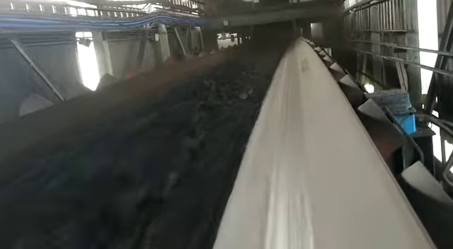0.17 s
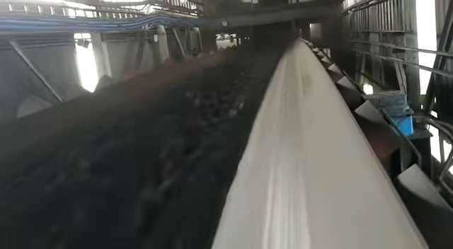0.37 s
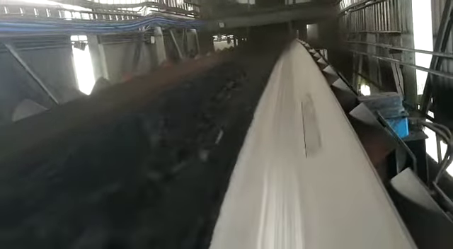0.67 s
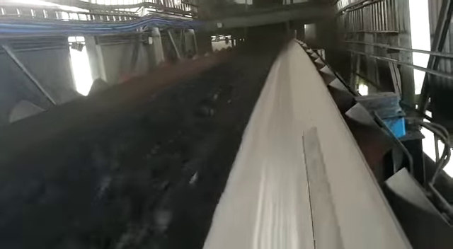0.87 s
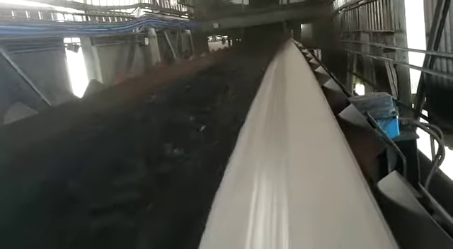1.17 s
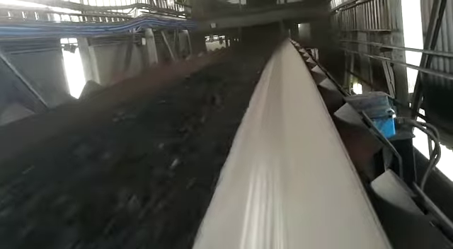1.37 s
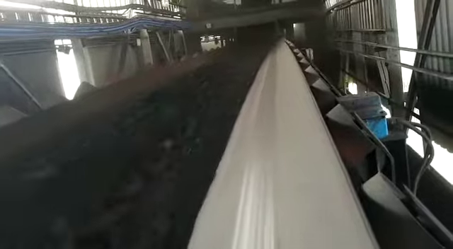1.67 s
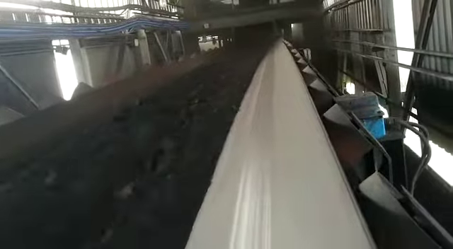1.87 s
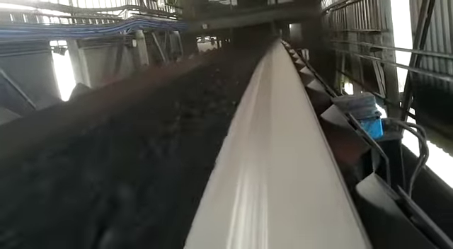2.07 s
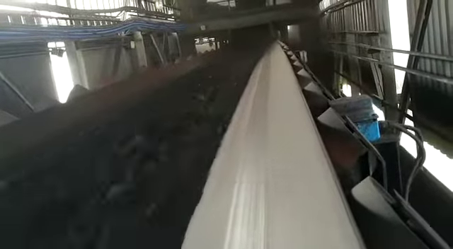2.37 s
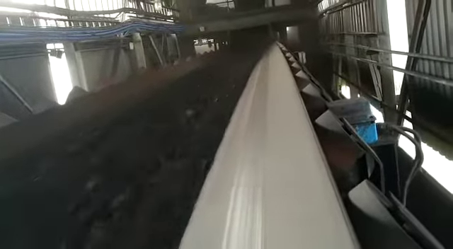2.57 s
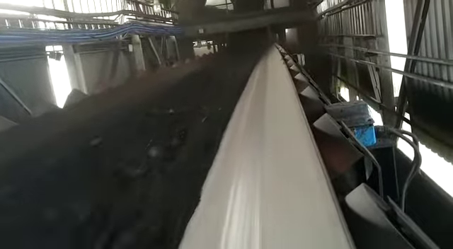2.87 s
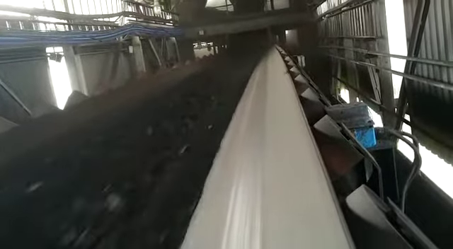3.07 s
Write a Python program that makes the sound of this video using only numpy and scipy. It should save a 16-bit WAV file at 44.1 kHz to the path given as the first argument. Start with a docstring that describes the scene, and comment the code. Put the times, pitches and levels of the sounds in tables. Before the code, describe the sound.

A conveyor roller squeaks quickly and regularly over the low rumble of the running belt.

```python
"""Squeaky conveyor roller

A loaded belt runs through a sheet-metal gallery. Belt and idlers rumble underneath, the steel frame
drones, and a farther roller moans now and then. Up front one dry roller squeaks once a turn, 5.5 times
a second: a stick-slip tone slides up, rasps and rings in the roller's shell and the gallery,
and the roller's stand hums after it."""
import sys
import numpy as np
from scipy import signal
from scipy.fft import rfft, irfft
from scipy.io import wavfile
from scipy.ndimage import uniform_filter1d, minimum_filter1d

SR = 44100
rng = np.random.default_rng(int(sys.argv[2]) if len(sys.argv) > 2 else 0)


def persist_wave(psi):
    """Save psi, clipped to +-1, as 16-bit WAV."""
    counts = np.round(np.clip(psi, -1, 1) * 32767).astype(np.int16)
    wavfile.write(sys.argv[1], SR, np.atleast_2d(counts).T)


N = 142002

# Tone of the belt and idlers. Each row: frequency in Hz, relative noise density in dB.
RUMBLE_SPECTRUM = [(15, -36), (30, -47), (48, -15.5), (85, -1.5), (150, 1), (200, -2.5), (225, -6.5),
                   (400, -8), (510, -8), (700, -11.5), (1050, -15.5), (1500, -22), (2400, -25.5),
                   (3300, -21), (4500, -28), (7000, -34.5), (8600, -50), (13000, -51.5), (14500, -79)]
# Stereo image of the rumble. Each row: frequency in Hz, left-right likeness from 0 (wide) to 1 (mono).
RUMBLE_LIKENESS = [(30, 1), (110, 1), (180, 0.98), (270, 0.98), (420, 0.65), (700, 0.65), (1100, 0.23),
                   (2000, 0), (12000, 0)]
# Fader ride on belt and frame together. Each row: time in seconds, gain in dB.
BED_RIDE = [(0, 0), (.9, .3), (1.35, -1), (1.8, .5), (2.3, 0.3), (2.7, 0.5), (3.199, -0.5)]
# Drones of the frame. Each row: pitch in Hz, half-width in Hz, level in dB before the ride.
FRAME_DRONES = [(55, 5.4, -41), (101.6, 3, -36), (159, 9.3, -40.5), (464, 4.4, -44), (490.4, 7.1, -45.5)]
# Path of the strongest drone. Each row: time in seconds, pitch in Hz, level in dB before the ride.
DRONE_DRIFT = [(0, 176.5, -29.5), (.45, 180.3, -29.5), (1.1, 178.9, -28), (1.4, 172, -36.5),
               (1.8, 190, -29.5), (2.2, 196.8, -30.5), (2.7, 194, -33), (3.2, 194, -31)]
# Moans of the farther roller. Each row: start in seconds, length in seconds, level at the crest in dB.
FAR_MOANS = [(1.114, 0.14, -33.5), (1.655, 0.17, -28.5), (2.615, 0.13, -37), (2.933, .17, -32.5)]
# That roller's modes. Each row: pitch in Hz, half-width in Hz, relative level in dB.
FAR_MODES = [(869, 18, -9.5), (956, 10, -18), (912, 34, -21.5), (1002, 8.8, -10.5), (1040, 22, -18)]
# Fader ride on the stand's hum. Each row: time in seconds, gain in dB.
HUM_RIDE = [(.1, -33.5), (.35, -32.5), (.6, -45), (.85, -29.5), (1.05, -33), (1.35, -47), (1.75, -27.5),
            (2.3, -32), (2.75, -32), (3.1, -33)]
# Dry rubbing under each squeak. Each row: frequency in Hz, relative noise density in dB.
RUB_SPECTRUM = [(900, -42), (1600, -2), (2300, 5.5), (3200, -5), (4500, -1), (6200, -10), (6700, -33),
                (8000, 7), (8600, -63), (10200, -22), (11800, -16), (13300, -26), (14000, -47)]
# Bright scrape as the dry spot grabs. Each row: frequency in Hz, relative noise density in dB.
BITE_SPECTRUM = [(2000, -12), (5000, -3), (8000, 6.5), (9000, -2), (11500, -0.5), (13400, -2), (14000, -8),
                 (15500, -15)]
# One squeak per turn. Each row: start in seconds, pitch in Hz, roughness from 0 to 1,
# relative levels of harmonics 1-4 in dB, left-minus-right balances of harmonics 2-4 in dB.
TURNS = [(0.031, 1899, 0.88, -26, -24, -28, -31, 3, 4, -4),
         (0.211, 1886, 0.64, -19, -20, -29.5, -27, -0.5, -3, -2),
         (0.395, 1930, 0.82, -27.5, -23.5, -28.5, -33.5, -1.5, 3, 3),
         (0.576, 1889, 0.42, -24.5, -20.5, -23, -25, -3.5, 9, 6),
         (0.761, 1897, 0.44, -17.5, -17.5, -17.5, -25, -1.5, 1.5, -2),
         (0.941, 1892, 0.71, -20.5, -16.5, -18.5, -21.5, 2, -9, -0.5),
         (1.125, 1887, 0.59, -21.5, -24, -26, -34, 4.5, -4, -2),
         (1.305, 1888, 0.38, -18.5, -12.5, -23, -23.5, -5, -5, -10),
         (1.483, 1874, 0.71, -20, -14.5, -20.5, -21, 5.5, -6, -6),
         (1.67, 1891, 0.95, -22, -22.5, -25.5, -27.5, 4, -1, -6),
         (1.855, 1878, 0.66, -20.5, -21.5, -20, -25, -3, 6, 7),
         (2.034, 1902, 0.98, -23.5, -19.5, -22.5, -28.5, 7, -2, -4),
         (2.219, 1892, 0.35, -24, -20.5, -21.5, -30, 7, 7, 0),
         (2.398, 1860, 0.62, -16, -18.5, -12.5, -22, -1.5, 2, 3.5),
         (2.58, 1886, 0.52, -19, -16.5, -21, -26.5, 3, -7, -0.5),
         (2.761, 1894, 1, -23.5, -23.5, -27, -32.5, -0.5, 0, -6),
         (2.948, 1893, 0.49, -24, -24, -23, -25.5, -3.5, 2, 0),
         (3.128, 1893, 0.99, -22.5, -19.5, -23.5, -30.5, -7.5, 0, -4)]
# How harmonics 1-4 grow and ring. Each row: head start in seconds, rise in seconds, sag in dB per second,
# shell mode in Hz, its bandwidth in Hz, its gain in dB for a harmonic at RING_REF_DB,
# reverb time in seconds, rasp at full roughness in dB.
HARMONIC_SHAPES = [(0.02, 0.014, -47, 1879, 8.1, -16, 0.42, -38),
                   (0.016, 0.024, -44, 3809, 10.2, 7.5, 0.27, -16.5),
                   (0.0048, 0.01, -116, 5563, 11.3, 1, 0.25, -9),
                   (0.0054, 0.012, -110, 7563, 50, -20, 0.27, -13)]
# Weak harmonics 5-8. Each entry: level in dB relative to the fourth, before the colour EQ.
TOP_HARMONICS_DB = [-20.5, -23.5, -18.5, -42]
# Tone colour of the squeaks, an EQ with deep notches in the treble. Each row: frequency in Hz, gain in dB.
SQUEAK_COLOUR = [(1500, 5.5), (1680, -10), (1790, 0), (3900, 0.5), (4300, -5), (4850, 4), (5100, 3.5),
                 (5600, 0), (5750, -3.5), (5900, -0.5), (6050, -4), (6650, -2), (7400, 0.5), (8050, -0.5),
                 (8600, -24), (9600, 3.5), (10300, -2), (10700, -17), (11200, 0), (11800, -6), (12400, -13),
                 (12850, 3.5), (13250, -1), (13650, -22), (14500, -17), (15100, 0)]
# Slaps off the gallery walls. Each row: delay in seconds, gain in dB before the loss per harmonic.
WALL_ECHOES = [(.009, -1), (.027, -2.5), (.057, -2.5)]

RING_REF_DB = -25  # harmonics louder than this lock harder onto the shell's modes, dB for dB


def amp(db):
    """Decibels to gain."""
    return 10 ** (np.asarray(db) / 20)


def unit_rms(x):
    """Scales to rms 1."""
    return x / np.sqrt(np.mean(x ** 2) + 1e-20)


def curve_at(points, hz):
    """Reads a curve on a log-frequency axis."""
    f, value = np.transpose(points)
    return np.interp(np.log(hz + 1), np.log(f + 1), value)


def place(mix, start_s, sound):
    """Drops a stereo sound into the mix."""
    at = round(start_s * SR)
    sound = sound[:, max(-at, 0):]
    part = mix[:, max(at, 0):][:, :sound.shape[1]]
    part += sound[:, :part.shape[1]]


def band(size, hz, half_width):
    """Resonant noise of rms 1; centred on 0 Hz it is a random wobble."""
    f = np.fft.rfftfreq(size, 1 / SR)
    return unit_rms(irfft(rfft(rng.standard_normal(size)) / (1 + ((f - hz) / half_width) ** 2), size))


def hiss(spectrum, size):
    """Friction noise of a given colour."""
    colour = amp(curve_at(spectrum, np.fft.rfftfreq(size, 1 / SR)))
    return irfft(rfft(rng.standard_normal(size)) * colour)


def gallery(x, t60, harmonic, direct_db=-6.5, loss_db=4):
    """A dense stereo tail, the direct sound and wall slaps that lose loss_db per harmonic."""
    t = np.arange(9600) / SR
    response = rng.standard_normal((2, len(t))) * amp(-60 * t / t60)
    response /= np.linalg.norm(response, axis=1, keepdims=True)
    response[:, 0] += amp(direct_db)
    for delay, db in WALL_ECHOES:
        at = round(delay * SR) + rng.integers(0, 40, 2)  # a little different at each ear
        response[[0, 1], at] += amp(db - loss_db * (harmonic - 0.5))
    return signal.fftconvolve(x[None], response, axes=1)[:, :len(x)]


def levelled(x, t, db, pan_db=0):
    """Sets level and balance by the loud first 95 ms of a squeak."""
    loud = (t > 0) & (t < .095)
    ears = unit_rms(amp([[pan_db / 2], [-pan_db / 2]]))
    return amp(db) * ears * x / np.sqrt(np.mean(x[:, loud] ** 2, axis=1, keepdims=True) + 1e-20)


def belt_rumble(level_db=-24.5, patch_db=0.58, swell_db=0.83):
    """The loaded belt rumbles over its idlers, with drifting patches of colour and a slow swell."""
    frames, hz = N // 512 + 5, np.fft.rfftfreq(2048, 1 / SR)
    noise = rng.standard_normal((5, frames, len(hz))).transpose(0, 2, 1)
    left, unrelated = noise[0] + 1j * noise[1], noise[2] + 1j * noise[3]
    likeness = curve_at(RUMBLE_LIKENESS, hz)[:, None]
    right = likeness * left + np.sqrt(1 - likeness ** 2) * unrelated
    patches = unit_rms(uniform_filter1d(uniform_filter1d(noise[4], size=14, axis=0), size=8, axis=1))
    swell = unit_rms(uniform_filter1d(rng.standard_normal(frames), size=16))
    colour = amp(curve_at(RUMBLE_SPECTRUM, hz)[:, None] + patch_db * patches + swell_db * swell)
    _, rumble = signal.istft(np.array([left, right]) * colour, nperseg=2048, noverlap=1536)
    return amp(level_db) * unit_rms(rumble[:, :N])


def frame_drone(waver_hz=9.2):
    """The steel frame sings in narrow, wavering bands; the strongest drifts in pitch."""
    times, pitches, levels = np.transpose(DRONE_DRIFT)
    t = np.arange(N) / SR
    waver = band(N, 0, waver_hz) + 1j * band(N, 0, waver_hz)
    phase = 2 * np.pi * np.cumsum(np.interp(t, times, pitches)) / SR
    drifting = amp(np.interp(t, times, levels)) * (waver * np.exp(1j * phase)).real
    return drifting + sum(amp(db) * band(N, hz, width) for hz, width, db in FRAME_DRONES)


def far_roller():
    """Short rubs swell into moans in a cluster of low modes."""
    out = np.zeros((2, N))
    for start, length, level_db in FAR_MOANS:
        rub = np.array([sum(amp(db) * band(N, hz, width) for hz, width, db in FAR_MODES)
                        for ear in range(2)])
        size = round(length * SR)
        swell = np.sin(np.linspace(0, np.pi, size))
        place(out, start, amp(level_db) * unit_rms(rub[:, :size]) * swell)
    return out


def stand_hum(hz=497.4, waver_depth_hz=7.05, delay_s=0.0067, length_s=0.25):
    """The dry roller's stand hums once a turn, swelling after each squeak."""
    t = np.arange(N) / SR
    swell = sum(np.sin(np.pi * np.clip((t - start - delay_s) / length_s, 0, 1)) ** 2
                for start, *_ in TURNS)
    hum = np.sin(2 * np.pi * np.cumsum(hz + waver_depth_hz * band(N, 0, 12.6)) / SR)
    ears = np.array([hum + 0.48 * band(N, hz, 12) for ear in range(2)])  # noise widens the image
    return amp(np.interp(t, *np.transpose(HUM_RIDE))) * swell * unit_rms(ears)


def grip(t, lead_s, rise_s, sag_db_per_s, hold_s=0.03, release_s=0.049):
    """Envelope of the dry spot: it grabs, sags and lets go."""
    attack = np.sin(np.pi / 2 * np.clip((t + lead_s) / rise_s, 0, 1)) ** 2
    release = np.clip(1 - (t - hold_s) / release_s, 0, 1)
    return attack * amp(sag_db_per_s * t) * release


def dry_scrape(t, force, bite_lead_s=0.002, bite_s=0.021):
    """Rubbing follows the grip and a bright bite marks the grab; both echo as faintly as harmonic 8."""
    rub = gallery(force * hiss(RUB_SPECTRUM, len(t)), t60=0.49, harmonic=8)
    grab = np.sin(np.pi * np.clip((t + bite_lead_s) / bite_s, 0, 1))
    bite = gallery(grab * hiss(BITE_SPECTRUM, len(t)), t60=0.091, harmonic=8)
    return levelled(rub, t, db=-46) + levelled(bite, t, db=-47)


def slip_phases(t, hz, rough, wander_hz=70.5, jitter_hz=390, scoop_s=0.00375, top_share=0.88):
    """The slip scoops up to pitch and wobbles. Gives its phase and a steadier one for harmonics 5-8."""
    wobble = rough * (0.015 * band(len(t), 0, wander_hz) + 0.023 * band(len(t), 0, jitter_hz))
    flat = 0.052 / (1 + np.exp(np.minimum(t / scoop_s, 20)))
    return [2 * np.pi * np.cumsum(hz * (1 - flat + share * wobble)) / SR for share in (1, top_share)]


def shell_mode(tone, hz, bandwidth):
    """One resonance of the roller's shell, with peak gain 1, driven by a complex tone."""
    radius = np.exp(-np.pi * bandwidth / SR)
    return signal.lfilter([1 - radius], [1, -radius * np.exp(2j * np.pi * hz / SR)], tone)


def squeak(t, hz, rough, levels_db, pans_db, flutter_hz=51.2, rasp_hz=311, trim_db=-2):
    """A raspy stick-slip tone over a dry scrape; it rings the shell's modes and the gallery."""
    size = len(t)
    phase, top_phase = slip_phases(t, hz, rough)
    flutter = abs(1 + 0.48 * band(size, flutter_hz, flutter_hz / 2))  # the grip comes and goes
    tones = np.zeros((2, size))
    for k, (db, pan_db, shape) in enumerate(zip(levels_db, pans_db, HARMONIC_SHAPES), 1):
        lead, rise, sag, mode_hz, bandwidth, mode_db, t60, rasp_db = shape
        rasp = band(size, rasp_hz, rasp_hz / 2) + 1j * band(size, rasp_hz, rasp_hz / 2)
        force = flutter * grip(t, lead, rise, sag)
        tone = force * (1 + rough * amp(rasp_db) * rasp) * np.exp(1j * k * phase)
        ring = amp(mode_db + db - RING_REF_DB) * shell_mode(tone, mode_hz, bandwidth)
        tones += levelled(gallery((tone + ring).real, t60, k), t, db, pan_db)
    # The top harmonics and the rubbing ride on the fourth harmonic's envelope.
    for k, top_db in enumerate(TOP_HARMONICS_DB, 5):
        top = gallery(force * np.cos(k * top_phase), t60=0.2, harmonic=k)
        tones += levelled(top, t, levels_db[-1] + top_db)
    return amp(trim_db) * tones + dry_scrape(t, force)


def dry_roller(preroll_s=0.03):
    """The dry spot comes round and squeaks once a turn, shaped by the squeak colour EQ."""
    t = np.arange(12288) / SR - preroll_s
    out = np.zeros((2, N))
    for start, hz, rough, *mix_db in TURNS:
        sound = squeak(t, hz, rough, levels_db=mix_db[:4], pans_db=[0, *mix_db[4:]])
        place(out, start - preroll_s, sound)
    colour = amp(curve_at(SQUEAK_COLOUR, np.fft.rfftfreq(2 * N, 1 / SR)))
    return irfft(rfft(out, 2 * N) * colour)[:, :N]


def scene():
    """Squeaks, hum and moans over a gently breathing bed of belt and frame."""
    ride = amp(np.interp(np.arange(N) / SR, *np.transpose(BED_RIDE)))
    return dry_roller() + stand_hum() + far_roller() + ride * (belt_rumble() + frame_drone())


def record(dry, ceiling=0.85, cutoff_hz=15750):
    """A quick peak limiter, then a steep low-pass."""
    allowed = np.minimum(1, ceiling / (abs(dry).max(0) + 1e-9))
    gain = uniform_filter1d(minimum_filter1d(allowed, size=401), size=401)
    lowpass = signal.firwin(511, cutoff_hz, window=("kaiser", 9), fs=SR)
    return signal.oaconvolve(dry * gain, lowpass[None], "same")


dry = scene()
out = record(dry)
persist_wave(out)
```